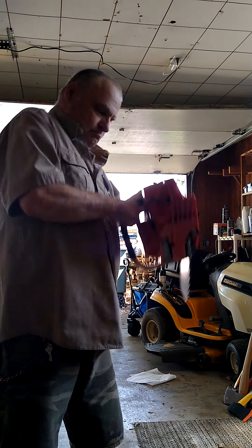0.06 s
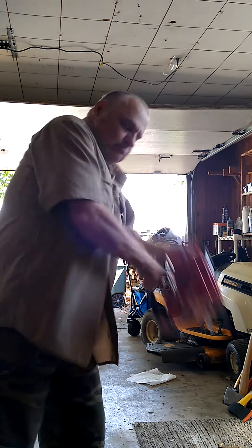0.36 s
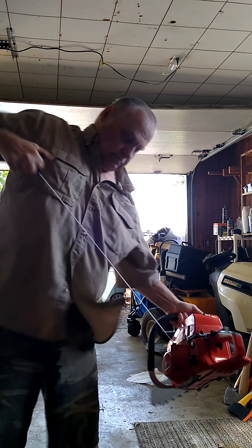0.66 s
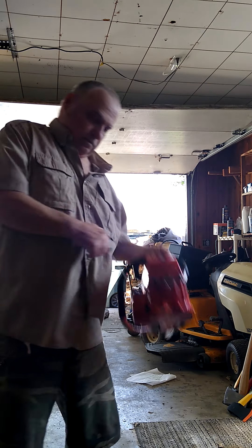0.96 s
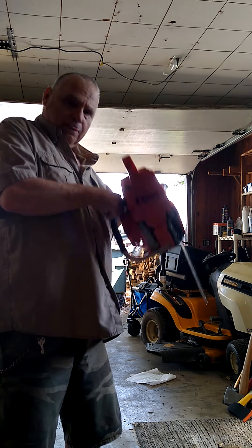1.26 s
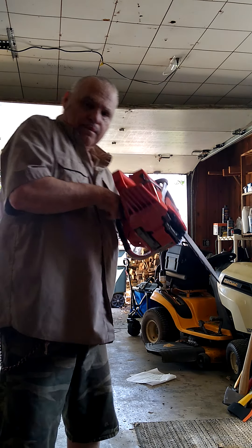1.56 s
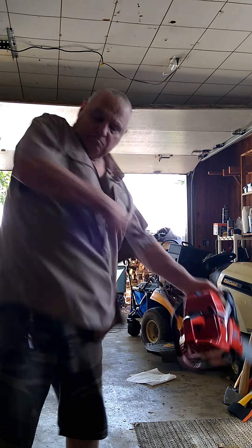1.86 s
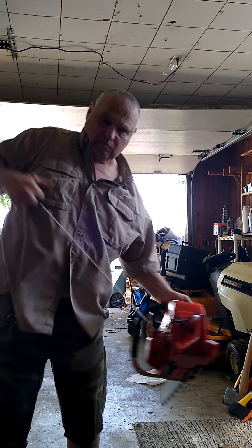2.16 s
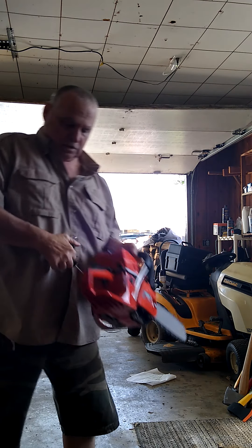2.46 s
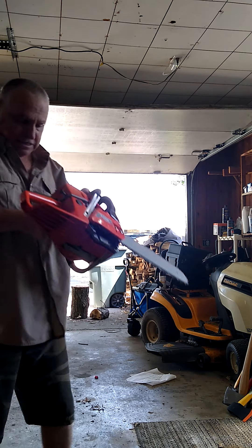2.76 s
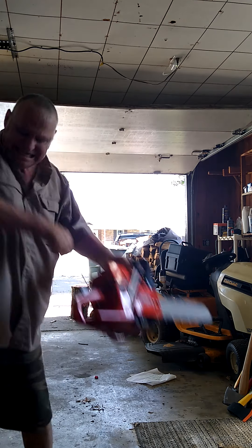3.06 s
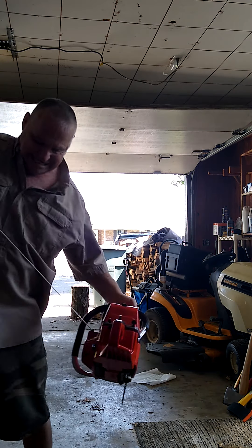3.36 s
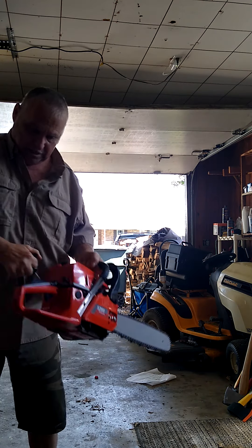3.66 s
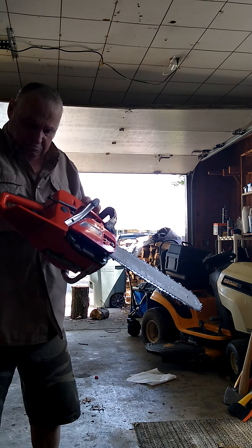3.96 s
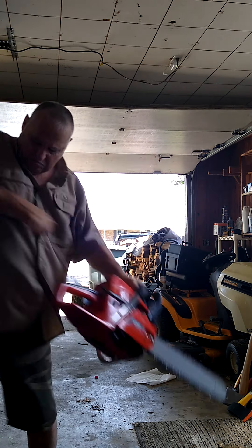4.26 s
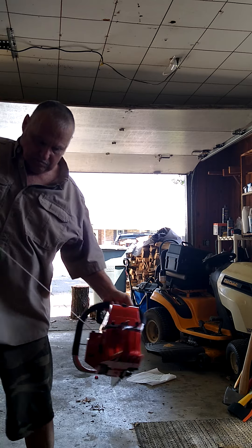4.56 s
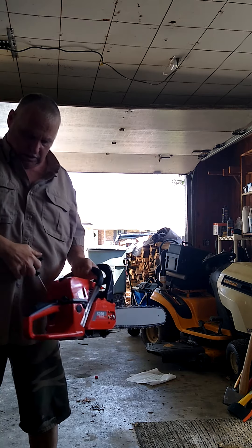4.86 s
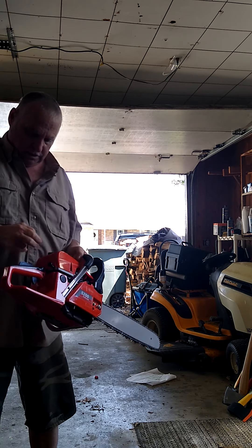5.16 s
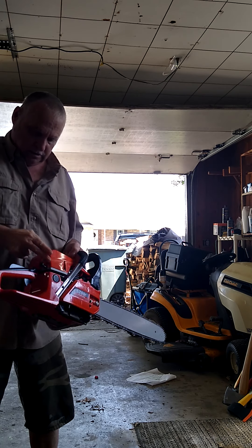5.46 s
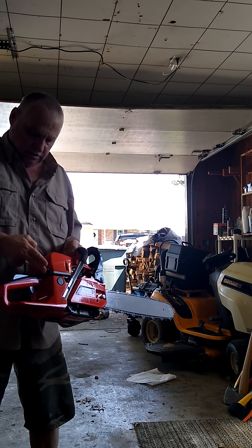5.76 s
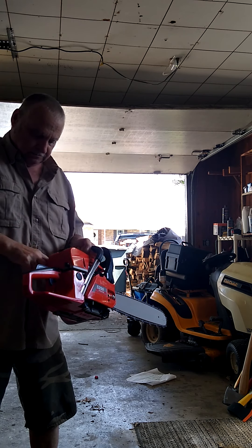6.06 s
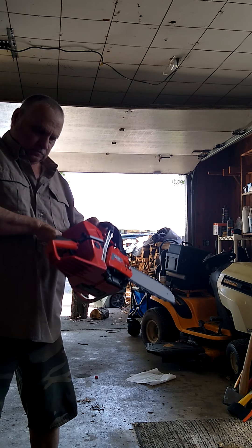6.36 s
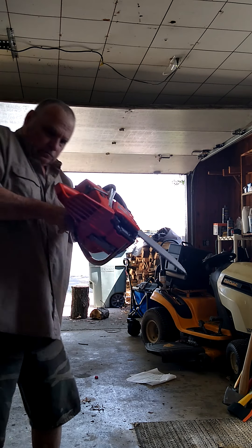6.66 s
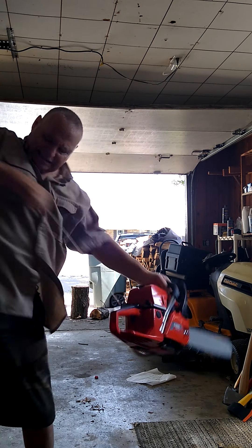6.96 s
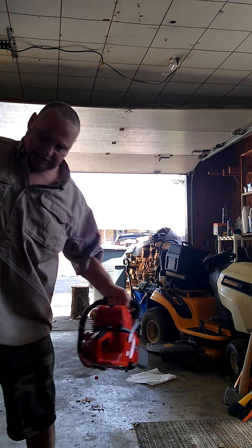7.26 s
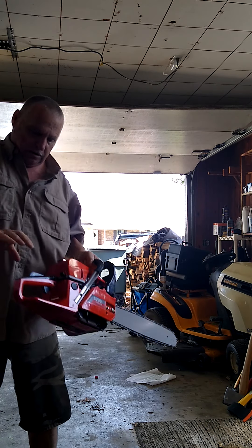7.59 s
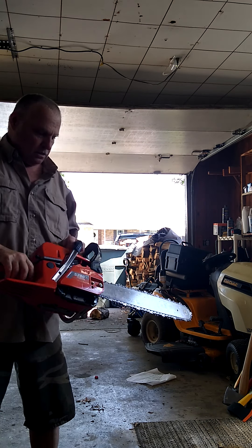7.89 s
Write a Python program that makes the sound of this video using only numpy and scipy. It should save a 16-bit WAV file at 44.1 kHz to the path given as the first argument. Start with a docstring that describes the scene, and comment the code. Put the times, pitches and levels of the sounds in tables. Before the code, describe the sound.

Four tugs on a chainsaw's starter cord whirr and knock without catching, then a fifth brings the engine to a fast, rough idle.

```python
"""Chainsaw starting in a garage

One microphone, a couple of metres from a two-stroke saw. Four pulls only crank it: the pawls catch,
the piston chuffs, the cord whirrs back and its grip knocks on the plastic housing. After a few clicks
at the controls the fifth pull fires, and the engine runs up to a fast, rough idle with the chain
rattling round. Faint outdoor air and a far hum come through the open door."""
import sys
import numpy as np
from scipy import signal
from scipy.fft import rfft, irfft
from scipy.io import wavfile
from scipy.ndimage import map_coordinates

SR = 44100
rng = np.random.default_rng(int(sys.argv[2]) if len(sys.argv) > 2 else 0)


def pcm_store(signal):
    """Save signal as 16-bit PCM."""
    levels = np.round(np.clip(np.atleast_2d(signal), -1, 1) * 32767)
    wavfile.write(sys.argv[1], SR, levels.astype(np.int16).T)


N = 349713
TIME = np.arange(N) / SR
CLUTCH_S = 7.183  # the clutch bites and jerks the chain into motion

# Pulls of the cord. Each row: pawl catch, first compression and end of stroke in seconds,
# strength in dB, offset of the stroke's closing knocks in dB.
PULLS = [(.539, .622, .860, -.5, .5), (1.954, 2.033, 2.279, .7, -1.5), (3.208, 3.289, 3.528, 1.5, 0),
         (4.379, 4.463, 4.724, .3, 2), (7.034, 7.110, 7.350, .3, 0)]
# Crank speed in a model pull, stretched to each stroke.
# Each row: seconds after the first compression, turns per second.
SPIN = [(-.08, 26.5), (-.01, 12.5), (0, 27), (.04, 36), (.085, 38), (.13, 27), (.2, 17), (.24, 4)]
# The grip lands after each rewind. Each row: time in seconds, level in dB, crack offset in dB,
# rattle decay in seconds.
LANDINGS = [(1.299, -21.5, -9, 0.0035), (2.791, -26.5, -6.5, 0.0087), (3.973, -24, -11, 0.0065),
            (5.17, -11.5, 3, 0.024), (7.637, -7.5, 3, 0.0038)]
# Ringing of the plastic housing. Each row: frequency in Hz, width in Hz, level in dB.
HOUSING = [(520, 110, 3), (775, 110, 0), (1000, 130, -4), (1184, 100, -1), (1421, 120, -1)]
# Spectrum of hard parts tapping. Each row: frequency in Hz, level in dB.
TICK = [(300, -30), (550, -6), (900, 0), (1400, -5.5), (2200, 1.5), (4000, -13), (8000, -33)]


def from_db(db):
    """Decibels to gain."""
    return 10 ** (np.asarray(db) / 20)


def rms_one(x):
    """Scale to unit power."""
    return x / np.sqrt(np.mean(x ** 2) + 1e-20)


def at_hz(points, hz):
    """Read a table on a log-frequency axis."""
    frequencies, values = np.transpose(points)
    return np.interp(np.log(hz), np.log(frequencies), values)


def gate(start, end, attack_s, release_s):
    """Rises from the start, holds, and falls after the end."""
    return np.clip((TIME - start) / attack_s, 0, 1) * np.clip(1 - (TIME - end) / release_s, 0, 1)


def gains(rows):
    """Gain curves of a table's dB columns, closing quickly outside its span."""
    s, *columns = np.transpose(rows)
    span = np.interp(TIME, [s[0] - .004, s[0], s[-1], s[-1] + .005], [0, 1, 1, 0])
    return [span * from_db(np.interp(TIME, s, db)) for db in columns]


def drift(per_s):
    """Smooth random wander of unit power."""
    coarse = TIME[::20]
    knots = rng.standard_normal(N // 20)
    curve = map_coordinates(knots, [coarse * per_s], order=3, mode="wrap")
    return rms_one(np.interp(TIME, coarse, curve))


def colour(x, spectrum):
    """Causal filter with this spectrum and steep skirts; white noise keeps its power."""
    size = 8192
    hz = np.maximum(np.fft.rfftfreq(size, 1 / SR), 1)
    octaves_outside = np.abs(np.log2(hz / np.clip(hz, spectrum[0][0], spectrum[-1][0])))
    gain = rms_one(from_db(at_hz(spectrum, hz) - np.minimum(36 * octaves_outside, 60)))
    cepstrum = irfft(np.log(gain))[:size // 2]
    cepstrum[0] /= 2
    minimum_phase = irfft(np.exp(rfft(2 * cepstrum, size)))
    return signal.oaconvolve(x, minimum_phase)[:N]


def resonate(x, modes):
    """Parallel resonances of alternating sign; white noise keeps its power."""
    out, power = 0, 0
    for k, (hz, width, db) in enumerate(modes):
        radius = np.exp(-np.pi * width / SR)
        feed = (1 - radius ** 2) / 2
        feedback = [1, -2 * radius * np.cos(2 * np.pi * hz / SR), radius ** 2]
        out += (-1) ** k * from_db(db) * signal.lfilter([feed, 0, -feed], feedback, x + 1e-18)
        power += from_db(db) ** 2 * feed
    return out / np.sqrt(power)


def impulses(times, sizes):
    """One click at each time."""
    samples = np.clip(np.asarray(times) * SR, 0, N - 1).astype(int)
    return np.bincount(samples, sizes * np.ones(len(times)), N)


def fading(hits, decay_s):
    """Each hit starts an exponential fall."""
    return signal.lfilter([1], [1, -np.exp(-1 / (decay_s * SR))], hits + 1e-18)


def grains(per_s, spread_db):
    """Dense small contacts of uneven size; unit power."""
    sizes = from_db(spread_db * np.minimum(rng.exponential(1, N), 4)) * rng.choice([-1, 1], N)
    return rms_one(sizes * (rng.random(N) < per_s / SR))


def turns(times, speed):
    """Moments at which the crank begins a turn, from the first time on."""
    angle = np.cumsum(speed) / SR
    return np.interp(np.arange(np.ceil(angle[-1])), angle, times)


def puffs(times, per_s, uneven_db, gas_db, decay_s):
    """A pressure pulse and a dying gush of gas at each port opening; about unit power."""
    sizes = from_db(uneven_db * rng.standard_normal(len(times))) * np.sqrt(SR / per_s)
    pulses = impulses(times, sizes)
    gush = fading(pulses, decay_s) * rng.standard_normal(N) * np.sqrt(2 / (decay_s * SR))
    return (from_db(gas_db) * gush - pulses) / np.hypot(1, from_db(gas_db))


def pull_level(power):
    """Gain of a sound that follows a power of the crank's speed through every pull."""
    s, speed = np.transpose(SPIN)
    follows = (speed / speed.max()) ** power
    corners = []
    for catch, first, end, db, _ in PULLS:
        stroke = first + s[1:] / s[-1] * (end - first)
        times = np.r_[catch - .004, catch, stroke, end + .033]  # the crank rests just after the stroke
        corners.append([times, from_db(db) * np.r_[0, follows, 0]])
    return np.interp(TIME, *np.hstack(corners))


def background():
    """Faint outdoor air and a distant machine's hum come through the open door."""
    # Spectrum of the air and tones of the hum. Each row: frequency in Hz, level in dB.
    air = [(25, -37), (35, -18.5), (52, -6.5), (105, -5.5), (147, -14), (290, -17.5), (361, -17.5),
           (449, -21), (1700, -23), (7490, -37.5), (8250, -60), (10700, -66.5)]
    tones = [(118.4, -76.5), (446.8, -71.5)]
    hum = 0
    for hz, db in tones:
        hum += from_db(db + drift(4.7)) * np.sqrt(2) * np.sin(2 * np.pi * hz * TIME + .3 * drift(8))
    return from_db(-63) * colour(rng.standard_normal(N), air) + hum


def handling():
    """Skin and cloth slide over the handles."""
    # Slides of hand or sleeve. Each row: start and end in seconds, level in dB.
    slides = [(0, 0.055, -33.5), (0.112, .14, -33), (1.539, 1.601, -40), (2.966, 3.026, -39),
              (6.933, 7.03, -41.5)]
    # Spectrum of their friction. Each row: frequency in Hz, level in dB.
    rustle = [(210, -53), (350, -13), (586, -7), (838, -5), (1050, -7.5), (2410, -9), (4370, -12),
              (7420, -22.5), (8250, -32.5), (10700, -64), (18200, -120)]
    level = sum(from_db(db) * gate(start, end, .0065, .052) for start, end, db in slides)
    return from_db(-11.5) * colour(level * grains(per_s=910, spread_db=-6.5), rustle)


def knocks():
    """Hands, pawls, piston, reel and grip jolt the housing: a bright crack, then a ringing buzz."""
    # Stray knocks. Each row: time in seconds, level in dB, crack offset in dB, rattle decay in seconds.
    strays = [(.024, -34.5, -24, 0.014), (.1435, -16, -32, 0.004), (.149, -24, -26, 0.0011),
              (4.361, -33, -18, 0.016), (7.646, -13, -6, 0.02)]
    # A knock at the piston's last compression, then two reel knocks as the cord slackens.
    # The same columns, timed from the end of the stroke.
    closing_knocks = [(-.032, -21, -6.5, 0.0061), (0.041, -24.5, -17.5, .007), (.183, -23.5, -18.5, .007)]
    # The pawls catch. One such row without the time.
    pawl_knock = (-29, -4.5, 0.031)
    # Spectra of the buzzing contact and of the crack. Each row: frequency in Hz, level in dB.
    clack_spectrum = [(330, -30), (440, 1), (560, 4), (700, 0), (900, 0), (1450, 0), (1750, -10),
                      (2300, -18)]
    crack_spectrum = [(900, -17.5), (1250, 0), (1500, 0.5), (1750, 0.5), (2150, 4), (2700, -4),
                      (3400, -9.5), (4500, -10), (6000, -22), (7500, -19), (8200, -42)]
    blows = list(strays) + list(LANDINGS)
    for catch, _, end, _, closing_db in PULLS:
        blows.append((catch, *pawl_knock))
        blows += [(end + after, db + closing_db, *rest) for after, db, *rest in closing_knocks]
    s, db, crack_db, rattle_s = np.transpose(blows)
    contact = np.zeros(N)
    for start, gain, decay_s in zip((s * SR).astype(int), from_db(db), rattle_s):
        t = TIME[:min(SR // 8, N - start)]
        contact[start:start + len(t)] += gain * np.exp(-t / decay_s)
    force = impulses(s, from_db(db + 5.5)) + from_db(-3.5) * contact * rng.standard_normal(N)
    ring = signal.sosfilt(signal.butter(4, 420, "high", fs=SR, output="sos"), resonate(force, HOUSING))
    clack = colour(contact * rng.standard_normal(N), clack_spectrum)
    crack_level = fading(impulses(s, from_db(db + crack_db)), decay_s=.013)
    crack = colour(crack_level * grains(per_s=8600, spread_db=13.5), crack_spectrum)
    return from_db(-1) * ring + from_db(-3) * clack + from_db(-5.5) * crack


def clicks():
    """Small hard parts snap into place and ring briefly, the housing faintly with them."""
    # Pawls, switch and choke. Each row: time in seconds, level in dB, snap offset in dB.
    events = [(0.451, -47, 5), (0.523, -35.5, -7), (1.248, -56, 1), (1.548, -53, -11), (1.915, -40.5, -4),
              (1.931, -33.5, -6.5), (2.741, -50, 16), (3.165, -42, -8), (3.185, -36, -6), (4.298, -44, 2.5),
              (5.519, -47, -30), (5.83, -33, -7.5), (6.226, -44, -30), (6.394, -49, -28), (6.547, -35, -36),
              (6.919, -45.5, 1.5)]
    # Ringing of the small levers. Each row: frequency in Hz, width in Hz, level in dB.
    levers = [(1292, 240, 9.5), (1742, 200, -8), (3930, 530, -10)]
    # Spectrum of the snap. Each row: frequency in Hz, level in dB.
    snap_spectrum = [(1500, -30), (4000, 5), (6000, -12.5), (7600, -3)]
    s, db, snap_db = np.transpose(events)
    tick = colour(fading(impulses(s, from_db(db)), decay_s=.014) * rng.standard_normal(N), TICK)
    snap = fading(impulses(s, from_db(db + snap_db)), decay_s=.0066) * rng.standard_normal(N)
    ring = from_db(-14) * resonate(tick, HOUSING) + from_db(-15.5) * resonate(tick, levers)
    return from_db(-12) * tick + ring + from_db(-5.5) * colour(snap, snap_spectrum)


def rewind_level():
    """Gain of the spring winding the cord back, ever more slowly, braking just before the grip lands."""
    overlap_s, brake_s, run_on_s, fade_db_per_s = .085, .044, .025, 22.5
    level = 0
    for (_, _, end, *_), (lands, *_) in zip(PULLS, LANDINGS):
        winding = gate(end - overlap_s, lands - brake_s, attack_s=.0097, release_s=brake_s + run_on_s)
        level += winding * from_db(-fade_db_per_s * np.maximum(TIME - end, 0))
    return level


def recoil():
    """The cord rubs through its eyelet while the reel chatters in the housing and its spring whirrs."""
    # Spectra of the chattering reel and the rubbing cord. Each row: frequency in Hz, level in dB.
    chatter_spectrum = [(120, -47), (200, -16), (291, -7.5), (477, -11.5), (537, 4.5), (658, -8),
                        (870, -1.5), (979, -8), (1080, 1), (1440, -1.5), (1640, -4.5), (2100, -8.5),
                        (2600, -13), (3380, -56.5), (5720, -120)]
    cord_spectrum = [(1290, -29.5), (2200, -4.5), (2900, 0), (3330, -7), (3800, -1), (5820, -12),
                     (7350, -10.5), (7810, -16.5), (8250, -27.5), (10700, -63), (18200, -120)]
    # Ringing of the reel and its spring. Each row: frequency in Hz, width in Hz, level in dB.
    reel_modes = [(3130, 220, 0), (3950, 300, -5)]
    rewind = rewind_level()
    reel_level = from_db(-28) * pull_level(power=1.49) + from_db(-35.5) * rewind
    cord_level = np.hypot(from_db(-36) * pull_level(power=.83), from_db(-39.5) * rewind)
    contacts = grains(per_s=980, spread_db=-1) * from_db(1.6 * drift(70) + 2.3 * drift(16))
    chatter = colour(reel_level * contacts, chatter_spectrum)
    friction = grains(per_s=4400, spread_db=1) * from_db(2.1 * drift(90))
    rub = colour(cord_level * friction, cord_spectrum)
    spring_level = np.minimum(cord_level, from_db(-40))
    whirr = resonate(spring_level * grains(per_s=600, spread_db=2), reel_modes)
    return from_db(-1) * chatter + from_db(.5) * rub + from_db(-5) * whirr


def cranking():
    """The unfired piston chuffs and clacks once a turn, draws air in between and rebounds at the end."""
    # Spectrum of the pumped air. Each row: frequency in Hz, level in dB.
    chuff_spectrum = [(40, -40), (62, -7.5), (90, -5), (130, -4.5), (180, -2), (230, 3.5), (300, -6),
                      (370, 0), (480, -8), (560, -3.5), (800, -14.5), (1000, -17.5)]
    t = TIME[:int(SPIN[-1][0] * SR)]
    speed = np.interp(t, *np.transpose(SPIN))
    stroke_fractions = np.append(turns(t, speed) / t[-1], 1)  # the last is the rebound
    _, first, end, *_ = np.transpose(PULLS)
    times = (first[:, None] + np.outer(end - first, stroke_fractions)).ravel()
    exhaust = puffs(times, per_s=38, uneven_db=1.26, gas_db=4, decay_s=.029)
    intake = from_db(-5.5) * puffs(times + .0115, per_s=29.5, uneven_db=-.5, gas_db=7.5, decay_s=.027)
    # a soft gulp of air ahead of the first compression
    gulp = from_db(-8) * puffs(first - .027, per_s=30, uneven_db=-.5, gas_db=-4.5, decay_s=.025)
    pulling = sum(gate(a, b, attack_s=.004, release_s=.02) for a, b in zip(first, end))
    flow = from_db(-10) * rng.standard_normal(N) * pulling
    level = from_db(-28.5) * pull_level(power=.55) * (TIME < CLUTCH_S)
    chuff = colour(level * (exhaust + intake + gulp + flow), chuff_spectrum)
    clack = colour(level * exhaust, TICK)
    return from_db(2.5) * chuff + from_db(-8.5) * clack


def squeak():
    """The dry reel sticks and slips on its axle as the cord winds in: a scratchy, unsteady tone."""
    # Squeaks. Each row: start and end in seconds, pitch in Hz, level in dB.
    squeaks = [(2.638, 2.665, 2100, -47), (4.975, 5.091, 2073, -39.5)]
    out = 0
    for start, end, hz, db in squeaks:
        pitch = hz * (1 + .062 * drift(500))
        tone = np.sin(2 * np.pi * np.cumsum(pitch) / SR)
        out += from_db(db) * gate(start, end, attack_s=.019, release_s=.066) * tone
    return out * from_db(5.4 * drift(150))


def exhaust_note(firings):
    """Pressure pulses ring the muffler; the exhaust's tone shifts as the engine speeds up."""
    # Resonances of the muffler. Each row: frequency in Hz, width in Hz, level in dB.
    modes = [(73, 7.2, -20), (150, 15, -18.5), (218.6, 12, -8), (307, 13, -7), (373.4, 17.6, 2.5),
             (436, 15, -8), (538, 31, -1.5), (606.5, 39, 6.5), (758, 25, 2.5), (809, 6.7, 2), (969, 25, -3),
             (1177, 36, -10)]
    # Their level over time. Each row: time in seconds, deep modes in dB, high modes in dB.
    mode_levels = [(7.14, -12.5, -8), (7.3, -0.5, 1.5), (7.62, -4.5, -2.5), (7.8, 2.5, 0.5),
                   (7.93, -5, -8.5)]
    split_hz = 410
    # the port opens gradually, so the pressure pulse has no treble
    pressure = signal.sosfilt(signal.butter(6, 1250, fs=SR, output="sos"), firings)
    deep_level, high_level = gains(mode_levels)
    deep = resonate(deep_level * pressure, [mode for mode in modes if mode[0] < split_hz])
    high = resonate(high_level * pressure, [mode for mode in modes if mode[0] >= split_hz])
    return from_db(-6) * (deep + high)


def metal_rattle(times, rate):
    """The clutch's jerk rings the guide bar; from then on firings shake muffler shell and chain."""
    # Spectra of the rasping shell and the chain. Each row: frequency in Hz, level in dB.
    rasp_spectrum = [(650, -22.5), (1100, -4.5), (1400, 1), (1900, -8), (2400, 2.5), (2560, -2.5),
                     (2850, 4.5), (3050, -9), (3260, -9), (3920, -3), (4210, -13.5), (4700, -25),
                     (6110, -47), (10300, -120)]
    chain_spectrum = [(2530, -20), (4300, 2.5), (5090, 5), (5420, 2), (5880, 4.5), (6620, -4), (7460, -0.5),
                      (7940, -14.5), (8250, -5.5), (10700, -60), (18200, -120)]
    # Ringing of the guide bar. Each row: frequency in Hz, width in Hz, level in dB.
    bar_modes = [(2840, 230, 7.5), (3680, 200, -7), (4850, 140, 0.5)]
    driven = TIME >= CLUTCH_S
    jerk = fading(impulses([CLUTCH_S], .84), decay_s=.066)
    rasp_level = from_db(-25) * driven + from_db(-44) * jerk
    chain_level = from_db(-41.5) * driven + from_db(-46) * jerk
    rasp = rasp_level * puffs(times, rate, uneven_db=1.5, gas_db=7, decay_s=.006)
    chain = chain_level * puffs(times, rate, uneven_db=6.5, gas_db=13, decay_s=.019)
    bar = from_db(-21) * resonate(jerk * rng.standard_normal(N), bar_modes)
    return colour(rasp, rasp_spectrum) + colour(chain, chain_spectrum) + bar


def engine():
    """One firing a turn rings the muffler, barks unevenly into the garage and rattles the metal."""
    # The engine catches, then runs. Each row: time in seconds, firings per second.
    run_up = [(7.14, 36.8), (7.166, 39.2), (7.191, 51)]
    running = [(7.22, 61.3), (7.298, 67.3), (7.386, 72.4), (7.414, 73.0), (7.454, 72.9), (7.508, 74.4),
               (7.666, 76.4), (7.744, 78.7), (7.888, 75.8), (7.92, 75.7)]
    # Spectrum of the exhaust's bark. Each row: frequency in Hz, level in dB.
    bark_spectrum = [(50, -25.5), (70, -19), (110, -14.5), (200, -15), (300, -6), (420, -5.5), (560, -4),
                     (700, -11), (850, -16.5), (1100, -16.5), (1500, -24), (2100, -20.5)]
    attack_s, ease_db_per_s = .054, 1
    s, per_s = np.transpose(run_up + running)
    age = TIME - s[0]
    speed = np.interp(TIME, s, per_s) * (1 + .005 * drift(30))
    times = turns(TIME[age >= 0], speed[age >= 0])
    rate = np.interp(times, s, per_s)
    level = from_db(-11.5 - ease_db_per_s * age) * np.clip(.5 + age / attack_s, 0, 1)
    note = exhaust_note(level * puffs(times, rate, uneven_db=.8, gas_db=-22, decay_s=.004))
    gas = puffs(times, rate, uneven_db=1.5, gas_db=0, decay_s=.004)
    bark = from_db(-7.5) * colour(level * gas, bark_spectrum)
    rattle = metal_rattle(times, rate)
    return garage(bark, wet_db=2) + garage(rattle, wet_db=-1) - note


def garage(x, wet_db):
    """Direct sound and a diffuse tail that dies band by band."""
    # Reverberation of the garage. Each row: frequency in Hz, seconds to fall by 60 dB.
    decay_times = [(100, .25), (500, .31), (1200, .34), (3000, .32), (8000, .28)]
    t = TIME[:SR * 3 // 4]
    onset = np.clip(t / .004 - 1, 0, 1)
    edges_hz = np.geomspace(45, 11500, 9)
    tail = 0
    for low, high in zip(edges_hz, edges_hz[1:]):
        bandpass = signal.butter(2, [low, high], "band", fs=SR, output="sos")
        band = signal.sosfilt(bandpass, rng.standard_normal(len(t)))
        fall = from_db(-60 * t / at_hz(decay_times, np.sqrt(low * high))) * onset
        tail += band * fall / np.linalg.norm(fall)
    return (x + from_db(wet_db) * signal.oaconvolve(x, tail)[:N]) / np.hypot(1, from_db(wet_db))


def scene():
    """The saw in mono, a couple of metres away in the garage."""
    starter = garage(cranking(), wet_db=-9) + garage(recoil() + squeak() + handling(), wet_db=-6)
    contacts = garage(knocks() + clicks(), wet_db=-2)
    return (starter + contacts + engine() + background())[None]


def record(dry):
    """The recorder rounds the peaks and cuts the treble above 8 kHz."""
    lowpass = signal.ellip(10, .2, 90, 8000, fs=SR, output="sos")
    return signal.sosfilt(lowpass, 1.5 * np.tanh(dry / 1.5))


dry = scene()
out = record(dry)
pcm_store(out)
```